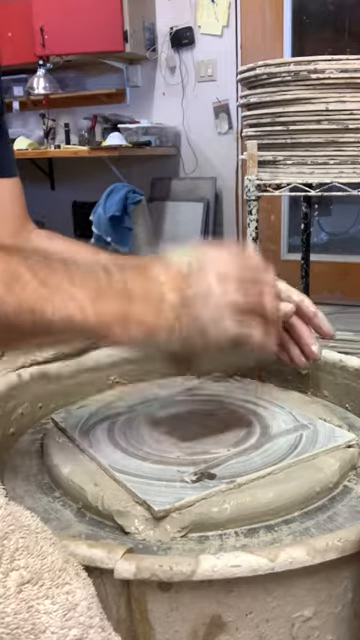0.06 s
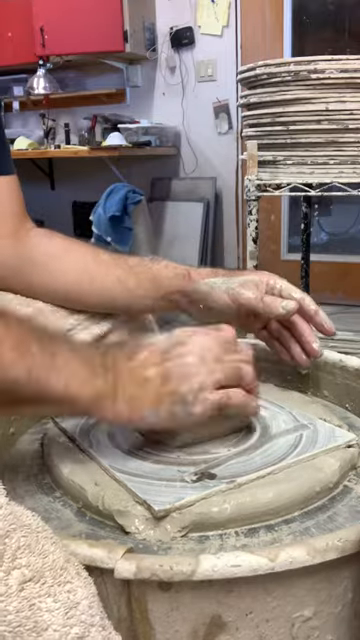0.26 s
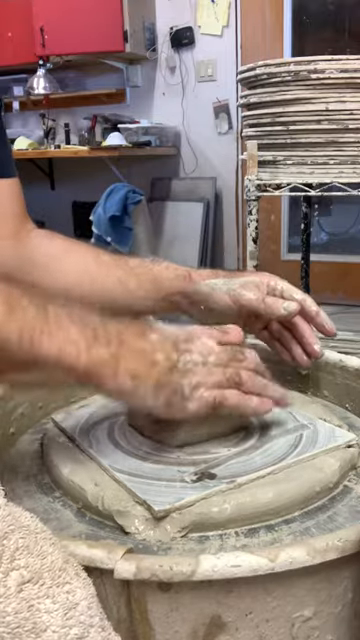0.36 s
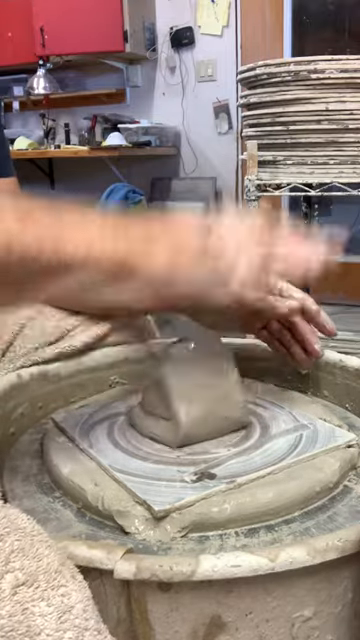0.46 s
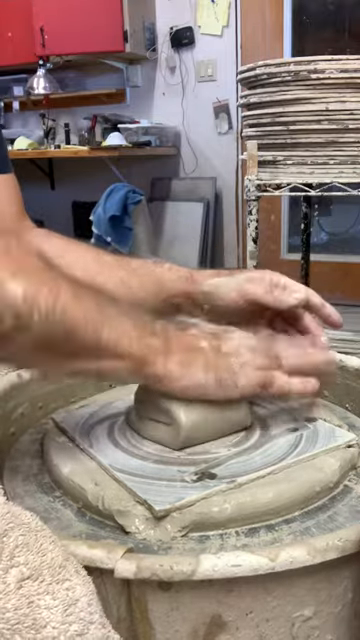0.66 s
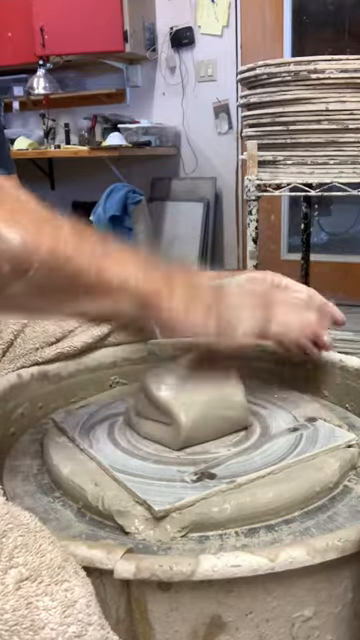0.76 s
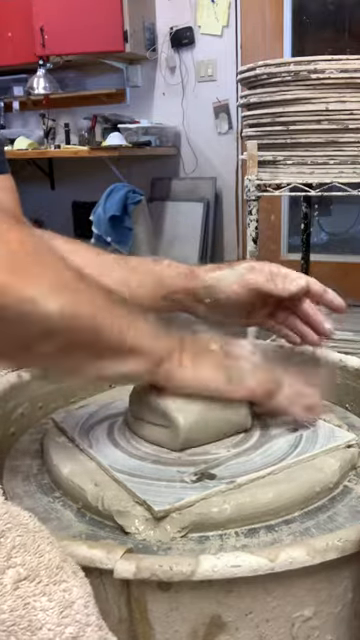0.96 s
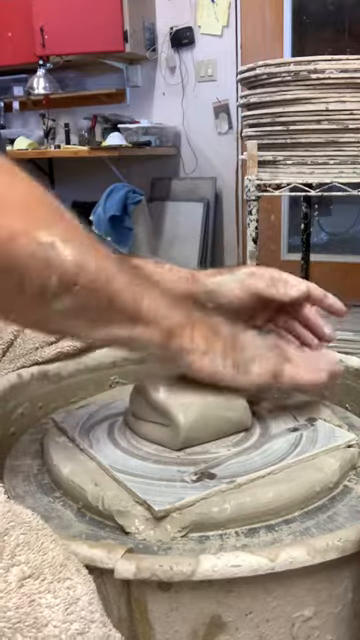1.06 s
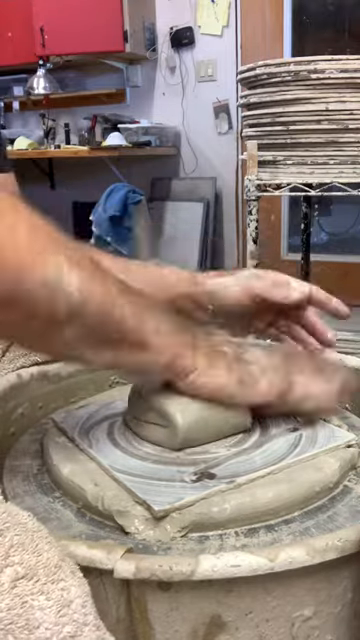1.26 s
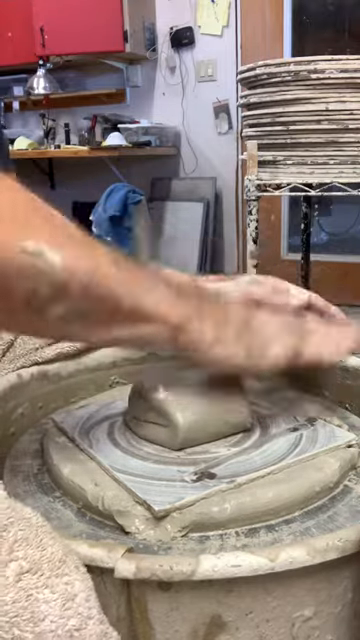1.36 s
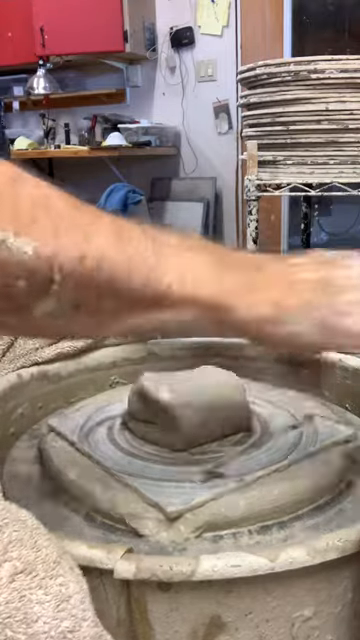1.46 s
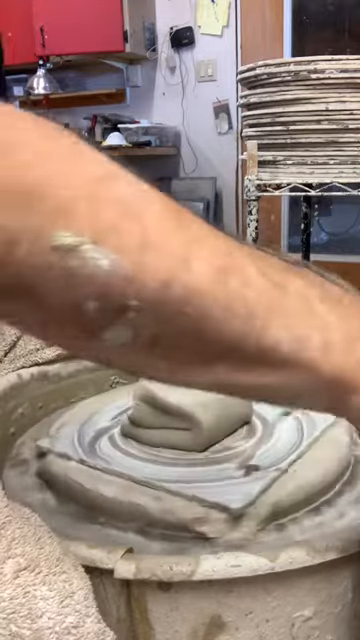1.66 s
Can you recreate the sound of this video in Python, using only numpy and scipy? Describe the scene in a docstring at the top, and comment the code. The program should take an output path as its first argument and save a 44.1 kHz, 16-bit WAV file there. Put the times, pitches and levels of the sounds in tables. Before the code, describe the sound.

A hand slaps wet clay on a potter's wheel four times, close by, each a wet crack with a thud. Around the last slap the wheel's motor starts softly, then thin squeaks follow. A small studio hums faintly.

```python
"""A faint mains hum in a small studio, then four slaps of a hand on wet clay, close to the microphone.
The clay sits on a potter's wheel, a little to the right of the stereo pair. Each slap is a wet crack
of skin, a pop of air trapped under the palm and a thud that shakes the wheel; the room rings briefly.
Around the last slap the wheel motor starts, and thin squeaks follow."""
import sys
import numpy as np
from scipy import signal
from scipy.fft import rfft, irfft
from scipy.io import wavfile

SR = 44100
rng = np.random.default_rng(int(sys.argv[2]) if len(sys.argv) > 2 else 0)


def wav_record(signal):
    """Record a signal, one row per channel, as 16-bit PCM in the file named by sys.argv[1]."""
    frames = np.transpose(np.atleast_2d(signal))
    bounded = np.clip(frames, -1, 1)
    # unit amplitude maps onto the largest positive 16-bit level
    quanta = np.round(bounded * 32767).astype(np.int16)
    wavfile.write(sys.argv[1], SR, quanta)


N = 74970
T = np.arange(N) / SR


def undb(db):
    """Decibels to gain."""
    return 10 ** (np.asarray(db) / 20)


def unit(x):
    """Scale to an rms of 1."""
    return x / np.sqrt(np.mean(x ** 2))


def colour(x, points):
    """Causal filter through (Hz, dB) points that keeps the power of white noise."""
    hz, db = np.array(points, float).T
    size = 2 * N
    f = np.maximum(np.fft.rfftfreq(size, 1 / SR), 1)
    gain = unit(undb(np.interp(np.log(f), np.log(hz), db)))
    cepstrum = irfft(np.log(gain))
    cepstrum[1:N] *= 2  # fold to minimum phase
    cepstrum[N + 1:] = 0
    return irfft(rfft(x, size) * np.exp(rfft(cepstrum)))[..., :N]


def late(x, delay_s):
    """Delay a sound."""
    return np.interp(T - delay_s, T, x, left=0)


def from_right(x, lag_s=5 / SR, balance_db=1):
    """A source right of the microphone: the left channel hears it later and weaker."""
    return np.array([late(x, lag_s) * undb(-balance_db / 2), x * undb(balance_db / 2)])


def diffuse_noise(shared=0.23):
    """Noise around the microphone: alike on both sides in the bass, mostly unrelated above it."""
    highpass = signal.butter(1, 400, "high", fs=SR, output="sos")
    own = signal.sosfilt(highpass, rng.standard_normal((2, N)))
    return np.sqrt(shared) * from_right(rng.standard_normal(N)) + np.sqrt(1 - shared) * own


def even_noise(span_s=0.008, passes=4):
    """Noise whose power is spread evenly over pitch and time, so that no tone sticks out."""
    size = 4 * int(span_s * SR / 4)
    x = rng.standard_normal(N)
    for _ in range(passes):
        frames = signal.stft(x, nperseg=size)[2]
        x = signal.istft(frames / (np.abs(frames) + 1e-18), nperseg=size)[1][:N]
    return unit(x)


def crackle(spread_db=7.5):
    """Dense clicks of uneven size: a wet film bursting."""
    sizes = undb(spread_db * rng.standard_normal(N // 10 + 1))
    return unit(np.repeat(sizes, 10)[:N] * rng.standard_normal(N))


def burst(at, decay_s, rise_s=0.0017, hold_s=0):
    """Envelope that rises to its peak, holds and dies away."""
    return np.exp(-np.maximum(at - T, 0) / rise_s - np.maximum(T - at - hold_s, 0) / decay_s)


def swell(age, peak_s):
    """Envelope of a soft, heavily damped push."""
    return (age / peak_s * np.exp(1 - age / peak_s)) ** 2


def glide(hz):
    """A sine that follows a changing pitch."""
    return np.sin(2 * np.pi * np.cumsum(hz) / SR)


def tones(partials):
    """Steady sines in random phase."""
    return sum(np.sqrt(2) * undb(db) * np.sin(2 * np.pi * (hz * T + rng.random())) for hz, db in partials)


def ring(modes):
    """A struck body: each mode dies away at its own rate."""
    return sum(undb(db - 60 * T / t60) * np.sin(2 * np.pi * hz * T) for hz, db, t60 in modes)


# partials of the mains hum (frequency [Hz], level [dB])
MAINS_PARTIALS = [(59.5, -60), (119, -49.5), (292, -64.5), (402, -71.5), (590, -72.5)]
# spectrum of the studio's air (frequency [Hz], relative level [dB])
AIR_SPECTRUM = [(25, -9), (55, 21), (130, -18), (200, 4), (290, 0), (420, -8), (560, -5), (700, -22),
                (1100, -14), (1700, -18), (3000, -36.5), (8000, -36), (16000, -66)]
def room_tone(air_db=-50.5):
    """The studio at rest: mains hum, with soft air all around the microphone."""
    return from_right(tones(MAINS_PARTIALS)) + undb(air_db) * colour(diffuse_noise(), AIR_SPECTRUM)


# reverberation (band centre [Hz], level [dB], t60 [s], share common to both channels [0-1])
STUDIO_BANDS = [(28, -59, 0.13, 0.76), (55.6, -29, 0.33, 0.69), (126, -2.5, 0.56, 1), (284, -3, 0.65, 0.75),
                (510, -1, 0.44, 0.41), (790, -6.5, 0.44, 0.1), (1380, -5, 0.45, 0.089),
                (3170, -6.5, 0.41, 1), (6850, -9.5, 0.33, 1), (9800, -13.5, 0.32, 1),
                (15800, -20.5, 0.24, 0.43)]
def studio_reflections(x, build_s=0.006):
    """Dense reflections off the near walls; each band has its own level, decay and width."""
    common = rfft(from_right(even_noise(span_s=0.04)))
    own = rfft([even_noise(span_s=0.04) for _ in range(2)])
    log_f = np.log(np.maximum(np.fft.rfftfreq(N, 1 / SR), 1))
    centres = np.log([row[0] for row in STUDIO_BANDS])
    tail = 0
    for weights, (_, db, t60, shared) in zip(np.eye(len(centres)), STUDIO_BANDS):
        spectrum = np.sqrt(shared) * common + np.sqrt(1 - shared) * own
        band = irfft(spectrum * np.interp(log_f, centres, weights), N)
        fade = undb(-60 * T / t60) * (1 - np.exp(-(T / build_s) ** 2))
        tail = tail + undb(db) * band * fade / np.linalg.norm(fade)
    return signal.fftconvolve(tail, x[None], axes=1)[:, :N]


# partials of the motor's buzz (frequency [Hz], level [dB])
MOTOR_PARTIALS = [(241, -51), (291, -55.5), (360, -58), (479, -52.5), (598, -59.5), (721, -65.5),
                  (840, -67), (959, -59.5), (1081, -64.5), (1319, -69.5), (2283, -76), (2401, -71)]
# spectrum of its rumble (frequency [Hz], relative level [dB])
RUMBLE_SPECTRUM = [(60, -71), (250, 4), (500, 0.5), (1000, -10), (1700, -17.5), (3000, -40), (8000, -61),
                   (16000, -42)]
# the rumble swells a little as the wheel gathers speed, then eases (time [s], level [dB])
RUMBLE_SWELL = [(1.3, -49), (1.56, -47.5), (1.68, -49.5)]
def wheel_motor(start_s=1.2, rise_s=0.047):
    """The motor starts: a buzz from the right and a wider rumble."""
    running = np.clip((T - start_s) / rise_s, 0, 1)
    rumble_db = np.interp(T, *np.array(RUMBLE_SWELL).T)
    rumble = undb(rumble_db) * colour(diffuse_noise(), RUMBLE_SPECTRUM)
    return running * (from_right(tones(MOTOR_PARTIALS)) + rumble)


# squeaks of the turning wheel (time [s], length [s], start pitch [Hz], end pitch [Hz], level [dB])
WHEEL_SQUEAKS = [(1.458, 0.011, 9630, 10300, -51), (1.488, 0.017, 10000, 9300, -51),
                 (1.501, .016, 8240, 9340, -29), (1.568, 0.027, 10320, 9660, -46),
                 (1.676, 0.0136, 9830, 8700, -43), (1.686, 0.013, 8930, 8600, -33)]
def wheel_squeaks(wobble_hz=115):
    """Short, rough, gliding whistles of rubbing parts."""
    lowpass = signal.butter(2, 900, fs=SR, output="sos")
    wobble = wobble_hz * unit(signal.sosfilt(lowpass, rng.standard_normal(N)))
    out = 0
    for at, length, start_hz, end_hz, db in WHEEL_SQUEAKS:
        progress = np.clip((T - at) / length, 0, 1)
        pitch = start_hz + (end_hz - start_hz) * progress + wobble
        out = out + undb(db) * np.sin(np.pi * progress) * glide(pitch)
    return out


# wet ticks (time [s], level [dB])
WET_TICKS = [(0.039, -45), (0.235, -38), (0.87, -50), (1.142, -53), (1.627, -41.5)]
# their spectrum (frequency [Hz], relative level [dB])
TICK_SPECTRUM = [(300, -18), (1500, 6.5), (3000, -3), (5000, 4.5), (8500, 0), (13000, -5), (16000, -2.5)]
def finger_ticks():
    """Small wet ticks of clay and fingers, faint even at close range."""
    envelope = sum(undb(db) * burst(at, decay_s=0.004) for at, db in WET_TICKS)
    return colour(envelope * crackle(), TICK_SPECTRUM)


# skin leaving the clay (time [s], rise [s], decay [s], level [dB])
SKIN_PEELS = [(0.3, 0.019, 0.035, -50), (0.355, 0.0047, 0.0025, -45), (0.73, 0.053, 0.065, -47.5),
              (1.426, 0.018, 0.014, -49), (1.661, 0.039, 0.3, -50.5)]
# spectrum of the hiss (frequency [Hz], relative level [dB])
PEEL_SPECTRUM = [(500, 10.5), (3000, 6.5), (6000, 5), (10500, 2), (16000, -2.5)]
def peeling():
    """Sticky hiss as wet skin peels off the clay or slides."""
    envelope = sum(undb(db) * burst(at, decay, rise) for at, rise, decay, db in SKIN_PEELS)
    return colour(envelope * rng.standard_normal(N), PEEL_SPECTRUM)


# light knocks (time [s], pitch [Hz], level [dB])
BAT_KNOCKS = [(0.2378, 1160, -32), (0.632, 995, -28), (0.6638, 1150, -33.5), (0.9978, 973, -29),
              (1.283, 1037, -29.5)]
def bat_knocks(peak_s=0.002):
    """The bat, the plate under the clay, taps the wheel head: a few damped cycles each time."""
    envelope = swell(T, peak_s)
    return sum(undb(db) * late(envelope * np.sin(2 * np.pi * hz * T), at) for at, hz, db in BAT_KNOCKS)


# clay giving way (time [s], decay [s], level [dB])
CLAY_SQUASHES = [(0.211, 0.0089, -18), (0.607, 0.013, -24.5), (0.664, 0.0041, -39.5),
                 (0.946, 0.0074, -24.5), (1.23, 0.0098, -23.5)]
# its spectrum (frequency [Hz], relative level [dB])
SQUASH_SPECTRUM = [(150, -15), (400, 1.5), (580, 0.5), (800, -9.5), (1200, -12), (1800, -12.5),
                   (2800, -25.5), (16000, -65)]
def squashes():
    """Dull squashes as the heel of the hand sinks into the clay."""
    envelope = sum(undb(db) * burst(at, decay) for at, decay, db in CLAY_SQUASHES)
    return colour(envelope * even_noise(), SQUASH_SPECTRUM)


# low bumps of the wheel (time [s], level [dB])
WHEEL_REBOUNDS = [(0.2605, -15), (0.6525, -18.5), (0.9881, -15), (1.2764, -16)]
def wheel_rebounds(hz=86, width_s=0.004):
    """The wheel drops back once after each slap."""
    return sum(undb(db) * np.exp(-((T - at) / width_s) ** 2) * np.cos(2 * np.pi * hz * (T - at))
               for at, db in WHEEL_REBOUNDS)


# modes of the bat (frequency [Hz], relative level [dB], t60 [s])
BAT_RESONANCES = [(558, -30.5, .36), (694, -27.5, 0.21), (960, -32, 0.28), (1140, -37.5, 0.11),
                  (1294, -34.5, 0.45), (1620, -27, 0.24)]
def bat_ring(at):
    """The bat rings faintly under a slap."""
    return late(ring(BAT_RESONANCES), at)


# modes of the wheel and its stand (frequency [Hz], relative level [dB], t60 [s])
WHEEL_RESONANCES = [(54.95, -35, 0.56), (82.4, -27, 0.39), (108, -41, 0.11), (176.85, -24.5, 0.26),
                    (233, -32.5, 0.38), (287.2, -33.5, 0.16), (395, -32, 0.14)]
def wheel_thud(at, start_hz=134, end_hz=90, sag_s=0.0097, peak_s=0.00929, ring_db=18):
    """The clay gives and pushes the wheel, which rings on from the peak of the push."""
    pitch = end_hz + (start_hz - end_hz) * np.exp(-T / sag_s)
    push = swell(T, peak_s) * glide(pitch)
    ringing = undb(ring_db) * late(ring(WHEEL_RESONANCES), peak_s)
    return late(push + ringing, at)


def air_pop(at, hz, overshoot=0.96, sag_s=0.0015, peak_s=0.0055):
    """Air trapped under the palm rings for a few cycles, dropping quickly to its pitch."""
    age = np.maximum(T - at, 0)
    pitch = hz * (1 + overshoot * np.exp(-age / sag_s))
    return -swell(age, peak_s) * glide(pitch * (age > 0))


# spectrum of flesh on clay (frequency [Hz], relative level [dB])
SMACK_SPECTRUM = [(100, -15), (300, 7.5), (650, 3.5), (950, 0.5), (1300, -4), (1800, -3), (2600, -10),
                  (6000, -3.5), (16000, -55.5)]
def palm_smack(at, hz, lag_s=0.00026):
    """Dull, fleshy burst; the shape of the palm sets its resonance."""
    noise = signal.lfilter(*signal.iirpeak(hz, Q=1, fs=SR), even_noise())
    return burst(at + lag_s, decay_s=0.0044) * unit(colour(noise, SMACK_SPECTRUM))


# spectrum of wet skin landing, heard close up (frequency [Hz], relative level [dB])
CRACK_SPECTRUM = [(200, -57), (900, -14.5), (1900, -15), (2600, 2.5), (3500, 8), (5200, 3.5), (7500, 8),
                  (10000, 10.5), (13000, 1.5), (16000, 5)]
def skin_crack(at, crack_db, contact_s, snap_db):
    """The wet palm lands with one sharp snap and clicks for as long as the contact spreads."""
    snap = undb(snap_db) * signal.unit_impulse(N, int(at * SR))
    envelope = undb(crack_db) * burst(at, decay_s=0.0023, rise_s=0.0018, hold_s=contact_s)
    return colour(snap + envelope * crackle(), CRACK_SPECTRUM)


# the four slaps (time [s], crack level [dB], contact [s], snap level [dB], smack level [dB],
# smack pitch [Hz], pop level [dB], pop pitch [Hz], pop delay [s], thud level [dB], thud delay [s])
HAND_SLAPS = [(0.2098, -13, 0.00024, -17, -17.5, 993, -4.5, 271, 0.00054, -14.5, 0.0042),
              (0.5971, -8, 0.0027, -10, -21, 1370, -23.5, 234.4, 0.0068, -16.5, 0.0074),
              (0.9317, -18.5, 0.0058, 6.5, -22, 1366, -14, 261.5, 0.00396, -15.5, 0.0077),
              (1.2199, -14, 0.0033, 9, -20.5, 2380, -10.5, 262.6, 0.00382, -15.5, 0.00756)]
def slaps():
    """The hand strikes the clay close to the microphone; returns skin, pops, thuds and bat apart."""
    skin = pops = thuds = bat = 0
    for (at, crack_db, contact_s, snap_db, smack_db, smack_hz,
         pop_db, pop_hz, pop_delay, thud_db, thud_delay) in HAND_SLAPS:
        skin += skin_crack(at, crack_db, contact_s, snap_db) + undb(smack_db) * palm_smack(at, smack_hz)
        pops += undb(pop_db) * air_pop(at + pop_delay, pop_hz)
        thuds += undb(thud_db) * wheel_thud(at + thud_delay)
        bat += undb(pop_db) * bat_ring(at)  # struck harder with a stronger pop
    return skin, pops, thuds, bat


def scene(pop_pan_db=2.2):
    """The wheel close up, the studio behind it; the pops sit a little further right than the rest."""
    background = room_tone() + wheel_motor()
    squeaks = wheel_squeaks()
    skin, pops, thuds, bat = slaps()
    clay = finger_ticks() + peeling() + bat_knocks() + squashes() + skin
    wheel = wheel_rebounds() + thuds
    pop_pan = undb([[-pop_pan_db / 2], [pop_pan_db / 2]])
    direct = from_right(squeaks + bat + wheel + clay) + pop_pan * from_right(pops)
    into_room = undb(2.5) * squeaks + undb(-3) * wheel + undb(-6) * pops + clay
    return background + studio_reflections(into_room) + direct


def record(dry, low_hz=34, top_hz=16000, ceiling=0.82):
    """The recorder thins the deepest bass, caps the peaks and cuts the top."""
    low_cut = signal.butter(3, low_hz, "high", fs=SR, output="sos")
    top_cut = signal.ellip(8, .2, 70, top_hz, fs=SR, output="sos")
    filtered = signal.sosfilt(top_cut, signal.sosfilt(low_cut, dry))
    return signal.sosfilt(top_cut, np.clip(filtered, -ceiling, ceiling))


dry = scene()
out = record(dry)
wav_record(out)
```